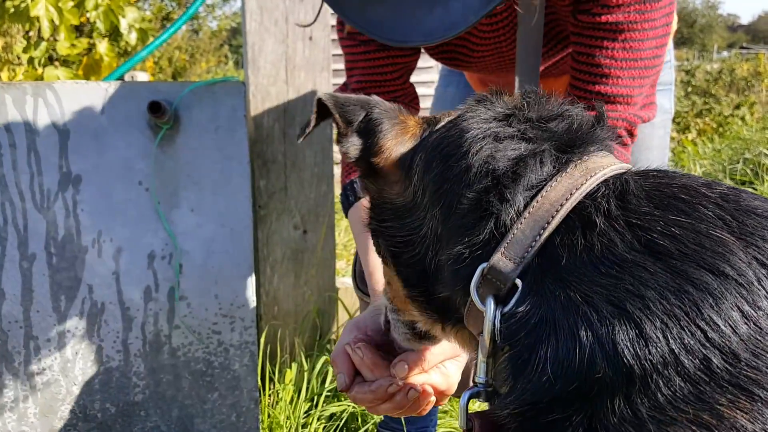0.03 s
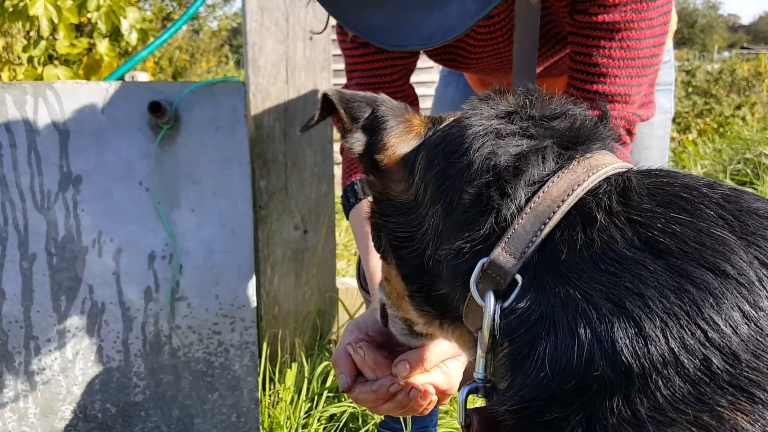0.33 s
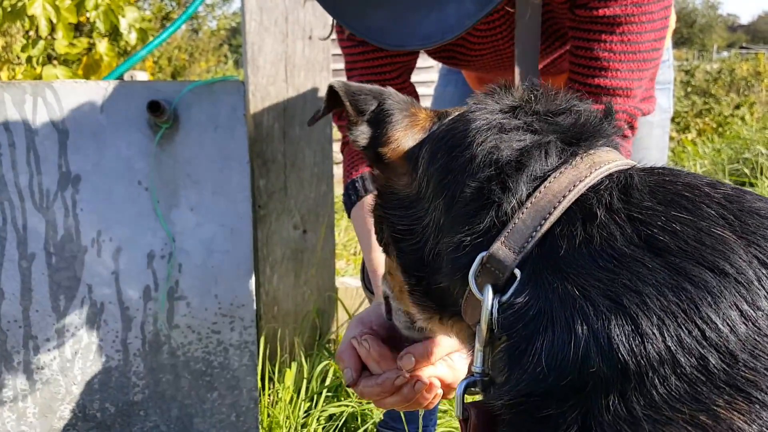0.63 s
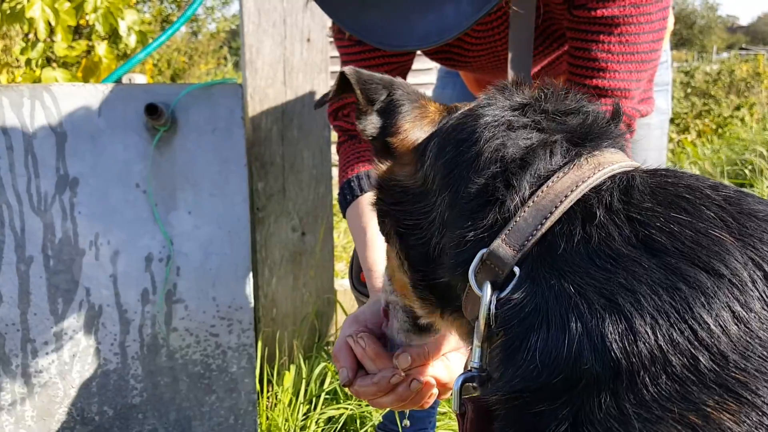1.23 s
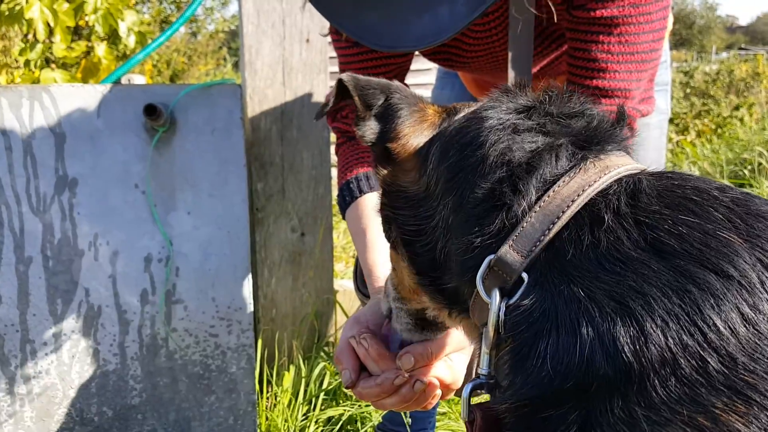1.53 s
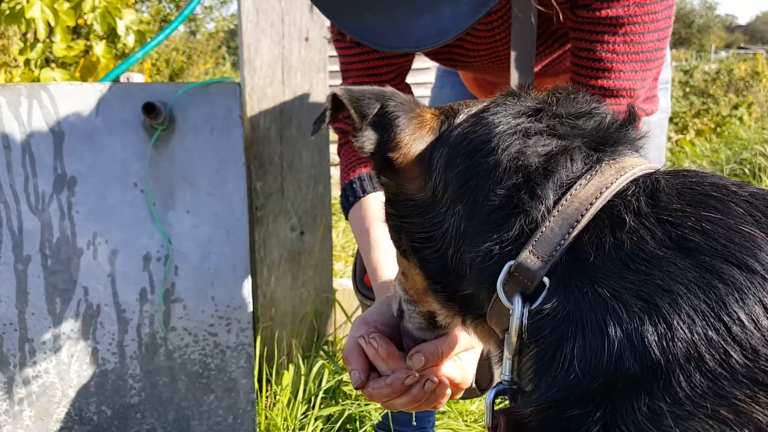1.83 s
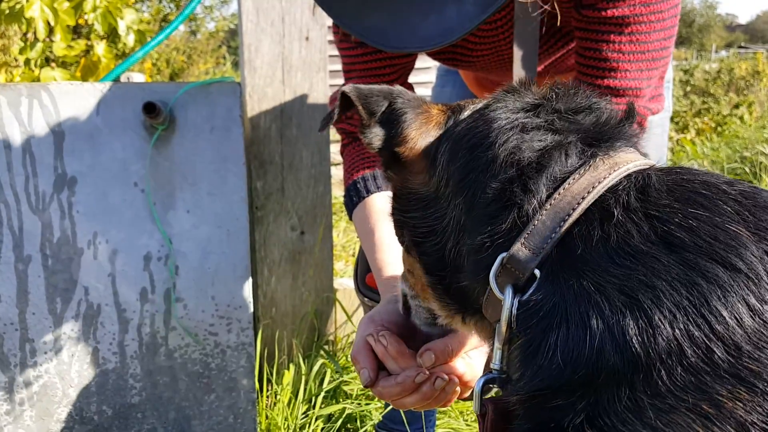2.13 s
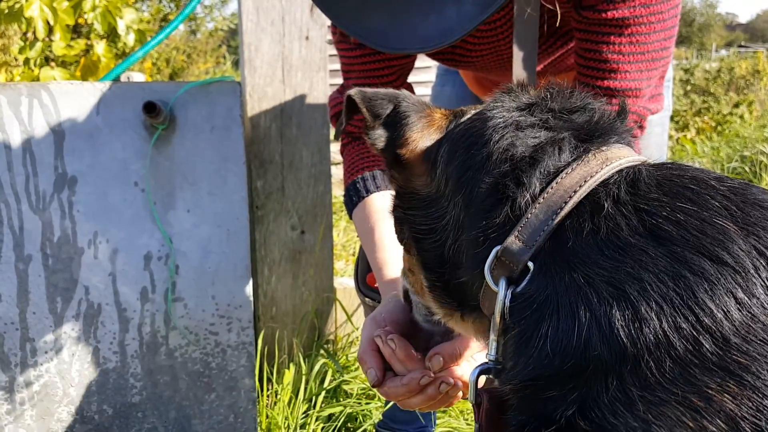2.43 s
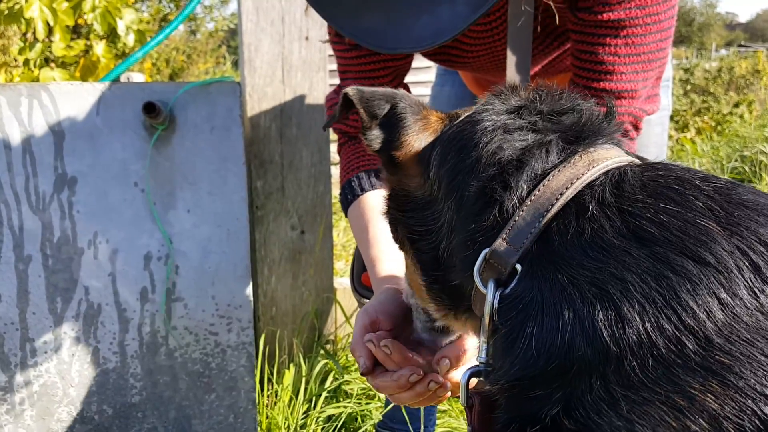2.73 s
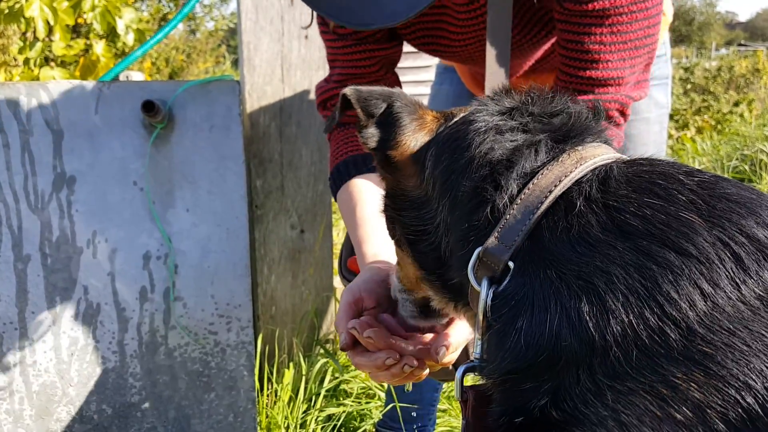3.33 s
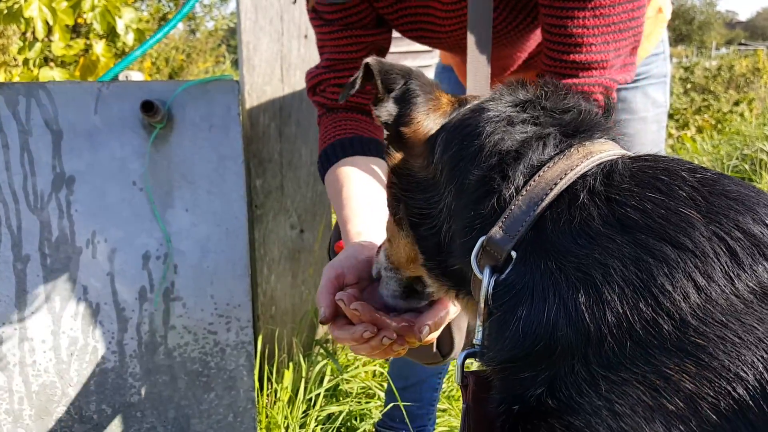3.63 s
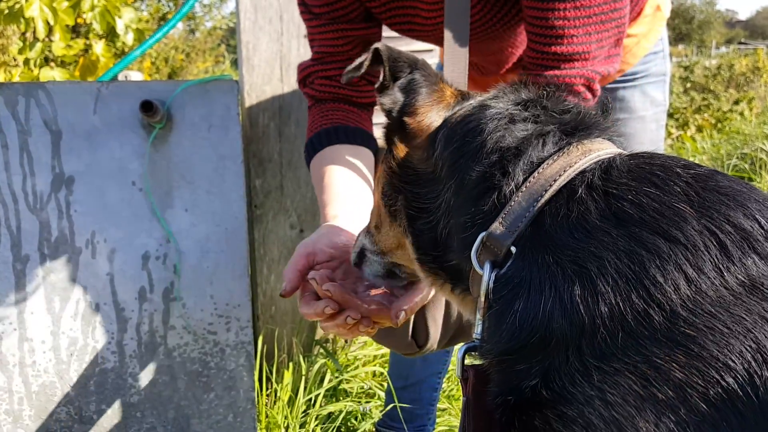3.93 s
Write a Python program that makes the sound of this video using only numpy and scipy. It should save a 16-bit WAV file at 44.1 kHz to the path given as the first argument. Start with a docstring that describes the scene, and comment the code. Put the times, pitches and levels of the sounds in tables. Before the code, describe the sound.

A dog laps water from cupped hands close to the microphone for all four seconds, in quick, uneven wet smacks with little bubble pops and droplet ticks. From about 1.3 seconds, wind gusts rumble on the left side of the microphone. They buffet hardest, with low thumps, from about 3.1 to 3.5 seconds, then ease as the lapping continues. A faint outdoor hush lies behind.

```python
"""A dog laps water from cupped hands outdoors, close to the microphone.
Each tongue stroke is a wet smack: tiny bubbles ring in the mouth as damped oscillators, with a fine
spray. Single bubbles pop, droplets tick, froth fizzes and the wet muzzle crackles in between.
Turbulent gusts buffet the left microphone port, while the right one is sheltered.
A faint open-air hush lies behind."""
import sys
import numpy as np
from scipy import signal
from scipy.fft import rfft, irfft
from scipy.io import wavfile

SR = 44100
rng = np.random.default_rng(int(sys.argv[2]) if len(sys.argv) > 2 else 0)


def unload_audio(sound):
    """Save the sound as a 16-bit wav file, at the path given as the first command line argument."""
    columns = np.transpose(np.atleast_2d(sound))
    # keep every value between -1 and 1, then stretch to whole-number steps
    steps = np.round(np.clip(columns, -1, 1) * 32767)
    wavfile.write(sys.argv[1], SR, steps.astype(np.int16))


N = 176400
T = np.arange(N) / SR

# Tongue strokes. Each row: start in seconds, nominal length in seconds, mouth resonance in Hz, its
# relative level in dB, squelch pitch in Hz, its relative level in dB, relative spray level in dB.
TONGUE_STROKES = [(0, 0.017, 1360, -36.5, 4060, -42, -43.5), (0.096, 0.0089, 1530, -50, 3980, -44, -65),
                  (0.11, 0.023, 2050, -48, 2470, -45, -49.5), (0.222, 0.011, 1700, -39.5, 2170, -48, -44.5),
                  (0.231, 0.013, 1530, -49, 5870, -54.5, -61), (0.325, 0.0095, 1220, -61, 3560, -64, -52),
                  (0.356, 0.023, 1560, -42, 2300, -40, -47.5), (0.43, 0.01, 2010, -66, 4000, -56, -50),
                  (0.534, 0.0096, 1130, -31, 2170, -35.5, -40), (0.553, 0.013, 1870, -43, 2320, -53, -48),
                  (0.675, 0.021, 1250, -45, 2440, -63, -50), (0.871, 0.022, 1400, -48, 2480, -45.5, -52),
                  (0.995, 0.021, 1230, -54, 2700, -47, -46), (1.133, 0.047, 825, -47.5, 3700, -52, -62),
                  (1.277, 0.015, 940, -46.5, 2560, -50, -52), (1.328, 0.012, 860, -48.5, 6150, -72, -43.5),
                  (1.435, 0.016, 1440, -52, 6240, -69, -56), (1.648, 0.011, 1680, -40, 2900, -47.5, -45),
                  (1.729, 0.018, 1640, -46.5, 2280, -75, -54.5),
                  (1.784, 0.031, 1450, -42, 4130, -46.5, -55), (1.99, 0.032, 1740, -42, 3070, -55.5, -49.5),
                  (2.145, 0.021, 1280, -44.5, 2760, -40, -50.5), (2.27, 0.036, 1900, -52, 4640, -61, -78),
                  (2.372, 0.03, 1600, -54, 2300, -59, -50.5), (2.494, 0.034, 1290, -39.5, 3200, -40.5, -46),
                  (2.599, 0.008, 1270, -41, 2880, -44, -53), (2.76, 0.014, 920, -53, 2720, -53.5, -60),
                  (2.91, 0.023, 1280, -45.5, 3030, -43.5, -43),
                  (3.088, 0.017, 2000, -51.5, 2390, -51, -52.5), (3.127, 0.047, 870, -59, 2740, -50, -51),
                  (3.241, 0.012, 1150, -37.5, 4150, -55, -79),
                  (3.258, 0.017, 1180, -38.5, 2580, -35, -38.5), (3.477, 0.042, 1720, -57, 3450, -48, -48),
                  (3.596, 0.012, 1180, -45.5, 2490, -40, -51),
                  (3.791, 0.028, 1020, -50.5, 2380, -52, -52.5), (3.845, 0.0087, 970, -55, 6200, -53, -48),
                  (3.951, 0.029, 1480, -39.5, 2920, -49, -53)]

def smacks():
    """Bubble resonance: as the tongue meets water the mouth rings, the film squelches, spray flies."""
    out = np.zeros(N)
    for start, length, mouth_hz, mouth_db, squelch_hz, squelch_db, spray_db in TONGUE_STROKES:
        mouth = burst(length, mouth_hz, spread_oct=0.33, cycles=11, count=22)
        squelch = burst(length, squelch_hz, spread_oct=0.43, cycles=9.9, count=26)
        spray = burst(length, hz=8800, spread_oct=0.39, cycles=37, count=40)
        add(out, start, from_db(mouth_db - 2.5) * mouth)
        add(out, start, from_db(squelch_db - 2.5) * squelch)
        add(out, start, from_db(spray_db - 9.5) * spray)
        add(out, start, from_db(spray_db - 11) * snaps(length, count=9))
    return out


# Single bubbles. Each row: start in seconds, initial pitch in Hz, relative peak level in dB.
AIR_POCKETS = [(0.121, 2430, -34.5), (0.1231, 670, -43.5), (0.371, 1520, -29), (0.5401, 928, -40.5),
               (0.6231, 1660, -39.5), (0.6734, 2340, -30), (0.6845, 1240, -38), (0.7954, 1860, -41.5),
               (0.8426, 1960, -43.5), (0.8925, 2470, -33), (0.9486, 1370, -37), (1.0052, 1420, -37),
               (1.0883, 1350, -42.5), (1.1447, 850, -45.5), (1.1705, 877, -37.5), (1.1862, 610, -42),
               (1.2435, 2100, -47), (1.3757, 1370, -42.5), (1.4348, 1420, -41.5), (1.474, 1620, -41),
               (1.7634, 1330, -39.5), (2.0038, 617, -40.5), (2.1546, 1240, -33), (2.237, 1330, -45),
               (2.3334, 1600, -44), (2.5102, 1290, -31.5), (2.6004, 1290, -47), (2.6266, 767, -33),
               (2.7616, 740, -49), (2.8632, 587, -47), (2.909, 1240, -34), (2.9186, 1224, -30),
               (3.0206, 1740, -41), (3.3243, 1470, -48), (3.906, 593, -33)]

def bubbles():
    """Free oscillation: an air pocket opens and rings, rising a little, with a shorter overtone."""
    cycles, overtone_ratio, overtone_db = 16.3, 3.1, -16
    out = np.zeros(N)
    for start, hz, db in AIR_POCKETS:
        gain = from_db(db + 4)
        add(out, start, gain * ping(hz, cycles, rise_oct_per_s=2))
        add(out, start, gain * from_db(overtone_db) * ping(hz * overtone_ratio, cycles))
    return out


# Droplets and snapping films. Each row: start in seconds, relative level in dB, pitch in Hz.
DROPLETS = [(0.1023, -59, 3800), (0.1274, -40, 6100), (0.2423, -41, 9500), (0.3306, -44.5, 4500),
            (0.432, -45, 3870), (0.519, -40, 6120), (0.5343, -35.5, 4970), (0.6547, -47, 12300),
            (0.6716, -31, 4770), (0.749, -46, 8600), (0.84, -50, 5700), (0.8929, -44, 8040),
            (0.9574, -43.5, 7800), (0.999, -36.5, 10360), (1.1499, -34, 3790), (1.171, -50, 3880),
            (1.3294, -54, 6600), (1.368, -46.5, 6230), (1.4523, -40.5, 4940), (1.6518, -39.5, 7020),
            (1.694, -49.5, 7950), (1.7867, -48, 5000), (1.8032, -38.5, 9320), (1.8727, -47, 9000),
            (2.0813, -45.5, 8600), (2.278, -39.5, 5700), (2.3017, -47.5, 4840), (2.794, -50.5, 8200),
            (2.81, -46, 13200), (2.8352, -40.5, 9000), (2.9148, -58, 6100), (2.958, -46, 4330),
            (2.9752, -39.5, 5400), (3.1514, -37, 4110), (3.1652, -36.5, 9300), (3.271, -35, 5480),
            (3.3244, -47, 3750), (3.5316, -42.5, 4000), (3.6017, -50, 8700), (3.6453, -44, 12100),
            (3.847, -42, 9270)]

def ticks():
    """Impulse excitation: a droplet gives a snap and a very short ringing around one pitch."""
    length_s = 0.004
    out = np.zeros(N)
    for start, db, hz in DROPLETS:
        add(out, start, from_db(db - 6) * burst(length_s, hz, spread_oct=0.25, cycles=37, count=8))
        add(out, start, from_db(db - 14.5) * snaps(length_s, count=3))
    return out


# Spells of froth on the tongue. Each row: start in seconds, nominal length in seconds, level in dB.
FROTH_SPELLS = [(0.218,.12,-58.5),(0.535,0.15,-63.5),(0.868,0.16,-67),(1.282,.12,-64),(1.65,0.11,-68),(1.938,0.17,-64),(2.342,0.12,-62),(2.76,.12,-65.5),(3.094,0.14,-63),(3.395,0.2,-65),(3.592,.016,-49.5),(3.788,0.12,-65)]

def froth():
    """The smallest bubbles resonate highest: they fizz as the wet tongue slides back."""
    out = np.zeros(N)
    for start, length, db in FROTH_SPELLS:
        add(out, start, from_db(db) * burst(length, hz=12800, spread_oct=0.22, cycles=18, count=50))
    return out


# Wetness of the muzzle, heard as crackle. Each row: time in seconds, relative level in dB.
MUZZLE_WETNESS = [(0.0, -76), (0.26, -66), (0.34, -63.5), (0.43, -70.5), (0.96, -65.5), (1.12, -71.5),
                  (1.78, -66.5), (1.88, -63.5), (2.07, -68.5), (2.44, -63), (2.58, -70.5), (2.84, -65.5),
                  (3.0, -66), (3.22, -83), (3.33, -60), (3.62, -75.5), (3.89, -67), (4.0, -59)]

def wet_muzzle():
    """Random superposition: thousands of small bubbles merge into crackle and a lower slosh."""
    span = N / SR
    crackle = grains(rng.uniform(0, span, 4000), span, 5590, spread_oct=0.667, cycles=16.6, spread_db=7.5)
    slosh = grains(rng.uniform(0, span, 1100), span, 1500, spread_oct=0.71, cycles=7, spread_db=4.5)
    envelope = from_db(in_time(MUZZLE_WETNESS) + drift(10.3))
    return envelope * (from_db(-0.5) * rms_one(crackle) + from_db(7.5) * rms_one(slosh))


def ping(hz, cycles, rise_oct_per_s=0):
    """A damped oscillator: a sine swells to peak 1 under a decay of 60 dB in the given cycles."""
    attack_share = 0.11
    t = np.arange(int(cycles / hz * SR) + 3) / SR
    age = t * hz / cycles
    envelope = (1 - np.exp(-(age / attack_share) ** 2)) * np.exp(-np.log(1000) * age)
    phase = 2 * np.pi * hz * t * 2 ** (rise_oct_per_s * t / 2)
    return np.sin(phase) * envelope / envelope.max()


def grains(times, span, hz, spread_oct, cycles, spread_db):
    """Superposition of tiny bubbles, each with its own pitch, strength and polarity."""
    out = np.zeros(int(span * SR))
    draws = np.clip(rng.standard_normal((len(times), 3)), -2.5, 2.5)
    for start, (pitch, strength, polarity) in zip(times, draws):
        grain_hz = min(hz * 2 ** (spread_oct * pitch), 0.45 * SR)
        add(out, start, np.sign(polarity) * from_db(spread_db * strength) * ping(grain_hz, cycles))
    return out


def burst(length, hz, spread_oct, cycles, count):
    """A bubble cloud swells and thins out, with the energy of rms 1 over its nominal length."""
    times = length * rng.beta(1.6, 2.6, count) * 1.35
    wave = grains(times, 2 * length + 0.02, hz, spread_oct, cycles, spread_db=6)
    return wave * np.sqrt(length * SR / np.sum(wave ** 2))


def snaps(length, count):
    """Film rupture: sharp, bright impulses crowd towards the start; rms 1 over their length."""
    highpass_hz = 9800
    clicks = np.zeros(int((length + 0.005) * SR))
    clicks[(length * SR * rng.beta(1, 1.6, count)).astype(int)] = rng.standard_normal(count)
    wave = signal.sosfilt(signal.butter(2, highpass_hz, "high", fs=SR, output="sos"), clicks)
    return wave * np.sqrt(length * SR / np.sum(wave ** 2))


def scatter(x, t60_s, delay_s=0.00098):
    """Diffuse reflection: echoes begin after a short delay and decay exponentially."""
    t = T[:SR // 2]
    tail = rng.standard_normal(len(t)) * from_db(-60 * t / t60_s) * (t > delay_s)
    return signal.fftconvolve(x, tail / np.linalg.norm(tail))[:N]


def with_reflections(x):
    """Direct sound sums with near scatter from hands, trough and post, and with fainter far scatter."""
    return x + from_db(-7.5) * scatter(x, t60_s=0.053) + from_db(-19.5) * scatter(x, t60_s=0.11)


def at_ports(x):
    """Acoustic shadow: the left port faces the dog; the right faces away and hears it later, duller."""
    shadow_hz, lag_s, notch_hz = 3980, 0.000042, 10450
    left, right = with_reflections(x), with_reflections(x)
    shadowed = signal.sosfilt(signal.butter(4, shadow_hz, fs=SR, output="sos"), right)
    leak = np.interp(T - lag_s, T, right)
    left = signal.lfilter(*signal.iirnotch(notch_hz, Q=18, fs=SR), left)
    return np.array([left, from_db(-7.5) * shadowed + from_db(-26.5) * leak])


# Wind strength at the exposed and the sheltered port. Each row: time in seconds, relative level in dB.
EXPOSED_GUSTS = [(0,-81),(1,-57.5),(1.19,-45),(1.31,-28),(1.37,-42),(1.5,-20),(1.56,-29.5),(1.66,-19.5),(1.71,-36.5),(1.76,-38.5),(1.79,-28),(1.92,-32.5),(1.99,-31.5),(2.12,-28.5),(2.24,-52.5),(2.285,-22),(2.33,-48),(2.4,-44.5),(2.45,-28),(2.56,-54.5),(2.61,-35),(2.66,-42.5),(2.8,-45),(2.95,-34),(3.18,-12),(3.27,-21),(3.3,-24),(3.36,-20.5),(3.4,-24.5),(3.44,-21),(3.515,-19),(3.545,-35.5),(3.73,-45.5),(3.755,-25.5),(3.79,-38),(4,-55)]
SHELTERED_GUSTS = [(0, -63.5), (1.1, -55), (1.55, -52.5), (1.8, -54), (2.1, -57), (2.26, -40), (2.4, -49.5),
                   (2.9, -54.5), (3.03, -46), (3.2, -53.5), (3.29, -36), (3.38, -47), (4, -46.5)]
# Spectra of rumble and buffeting. Each row: frequency in Hz, relative spectral density in dB.
RUMBLE_SPECTRUM = [(20, -16), (40, -4.5), (65, 4.5), (114, 0), (185, -7.5), (280, -22), (450, -35.5),
                   (800, -54), (2000, -94)]
BUFFET_SPECTRUM = [(60, -1.5), (180, 4.5), (300, 3), (450, -6.5), (700, -27), (1200, -36), (3000, -56.5)]
# Eddies that thump the exposed port. Each row: start in seconds, peak level in dB, pitch in Hz.
EDDIES = [(1.600, -12, 450), (3.141, -15, 470), (3.231, -7, 255), (3.371, -13, 240), (3.429, -10, 198),
          (3.510, -9.5, 169), (3.753, -17.5, 131)]

def wind():
    """Turbulent pressure rumbles separately at each port; strong gusts add buffeting on the left."""
    flutter_db, strong_gust_db, buffet_growth = 3.5, -11, 1.64
    gust_db = in_time(EXPOSED_GUSTS)
    buffet_db = strong_gust_db - 8 + buffet_growth * (gust_db - strong_gust_db)
    left = from_db(gust_db + 2.5 + flutter_db * drift(25)) * noise(RUMBLE_SPECTRUM)
    left += from_db(buffet_db + flutter_db * drift(48)) * noise(BUFFET_SPECTRUM)
    for start, db, hz in EDDIES:
        add(left, start, from_db(db) * ping(hz, cycles=3.45))
    right = from_db(in_time(SHELTERED_GUSTS) + flutter_db * drift(38)) * noise(RUMBLE_SPECTRUM)
    return np.array([left, right])


# Spectrum of the outdoor hush. Each row: frequency in Hz, relative spectral density in dB.
AIR_SPECTRUM = [(20, 2.5), (70, 3), (160, 4), (350, -10), (500, -12), (760, -9), (1300, -14.5), (1800, -13),
                (3400, -28.5), (8000, -35.5), (10200, -38.5), (15500, -30.5)]
# Likeness of the hush at the two ports. Each row: frequency in Hz, coherence from 0 to 1.
AIR_COHERENCE = [(100, 1), (600, 0.4), (1800, 0), (5000, 0)]

def open_air():
    """Partial coherence: a steady outdoor hush is alike at both ports in the bass, unlike higher up."""
    level_db, left_bias_db = -53.5, 3
    coherence = np.clip(per_bin(AIR_COHERENCE), 0, 1)
    mid = irfft(rfft(noise(AIR_SPECTRUM)) * np.sqrt((1 + coherence) / 2), N)
    side = irfft(rfft(noise(AIR_SPECTRUM)) * np.sqrt((1 - coherence) / 2), N)
    pan = from_db(left_bias_db / 2)
    return from_db(level_db) * np.array([(mid + side) * pan, (mid - side) / pan])


def noise(spectrum):
    """Spectral shaping: white noise takes on the given colour; rms 1."""
    return rms_one(irfft(rfft(rng.standard_normal(N)) * from_db(per_bin(spectrum)), N))


def drift(corner_hz):
    """Low-passed noise: a slow random fluctuation with rms near 1."""
    hop, settling_steps = 40, 2000
    pole = np.exp(-2 * np.pi * corner_hz * hop / SR)
    white = rng.standard_normal(N // hop + settling_steps + 2)
    slow = signal.lfilter([1], [1, -2 * pole, pole * pole], white)[settling_steps:]
    return np.interp(np.arange(N) / hop, np.arange(len(slow)), rms_one(slow))


def from_db(db):
    """Decibels to amplitude ratio."""
    return 10 ** (np.asarray(db) / 20)


def rms_one(x):
    """Normalisation to unit rms."""
    return x / np.sqrt(np.mean(x ** 2) + 1e-20)


def in_time(rows):
    """Linear interpolation of a time curve at every sample."""
    return np.interp(T, *np.transpose(rows))


def per_bin(rows):
    """Log-frequency interpolation of a curve at every FFT bin."""
    hz, values = np.transpose(rows)
    return np.interp(np.log(np.fft.rfftfreq(N, 1 / SR) + 1), np.log(hz), values)


def add(out, start, wave):
    """Superposition of a wave from a start time in seconds."""
    i = int(np.clip(start * SR, 0, len(out)))
    out[i:i + len(wave)] += wave[:len(out) - i]


def scene():
    """Sound pressures add at the two ports: the lapping dog, the wind and the open air."""
    lapping = smacks() + bubbles() + ticks() + froth() + wet_muzzle()
    return at_ports(lapping) + wind() + open_air()


def record(dry):
    """Band limiting: a steep elliptic low-pass removes the highest treble."""
    cutoff_hz = 16100
    return signal.sosfilt(signal.ellip(10, 0.3, 80, cutoff_hz, fs=SR, output="sos"), dry)


dry = scene()
out = record(dry)
unload_audio(out)
```